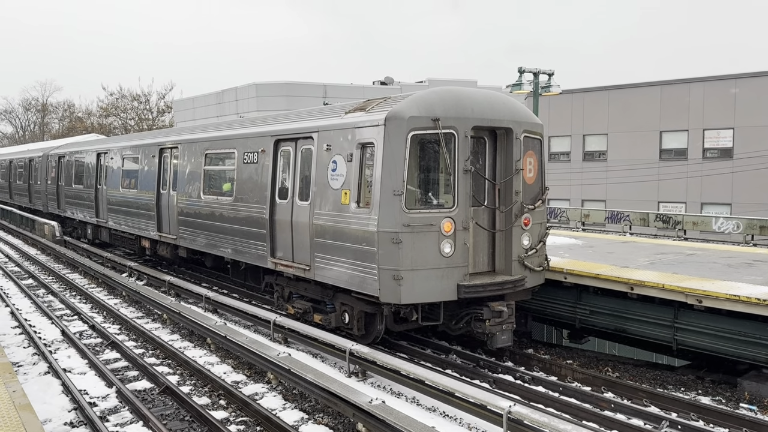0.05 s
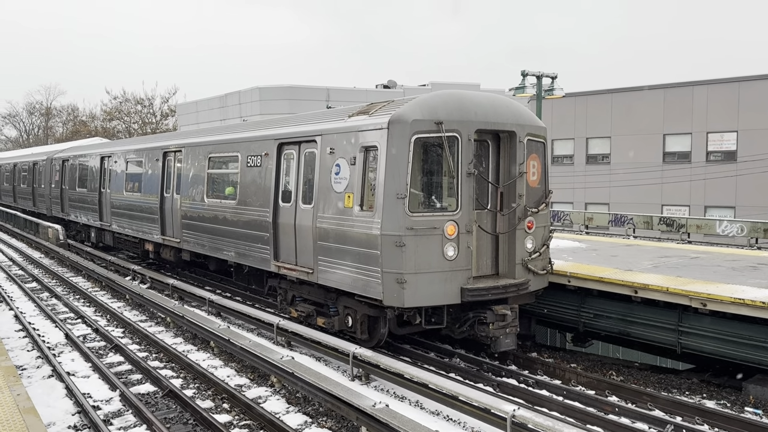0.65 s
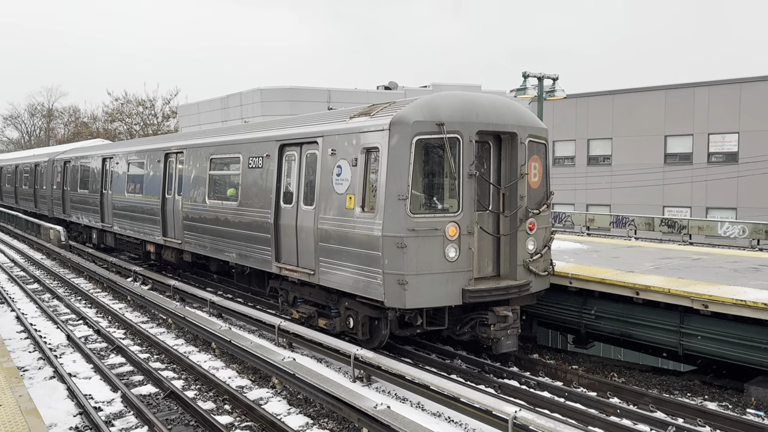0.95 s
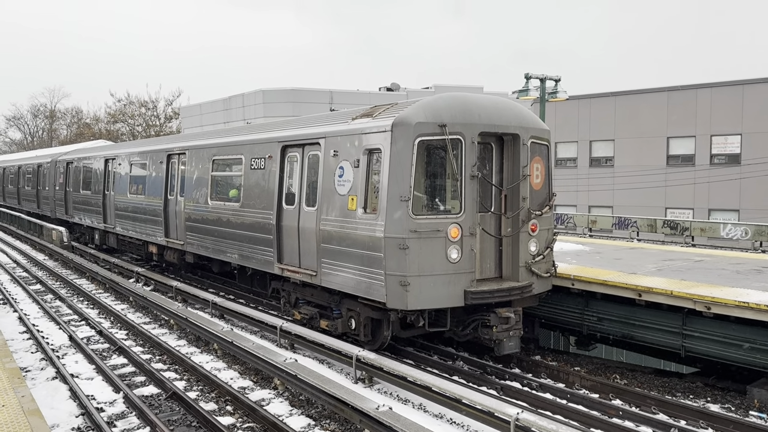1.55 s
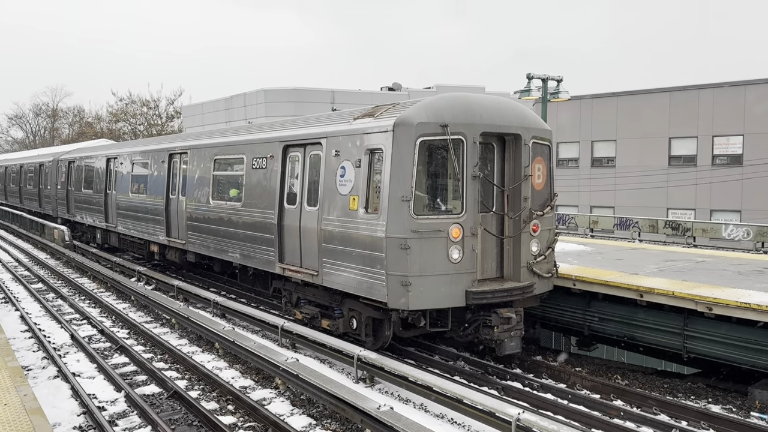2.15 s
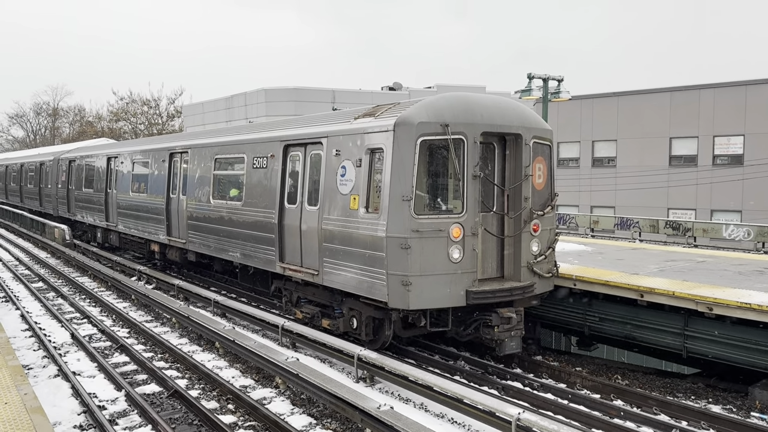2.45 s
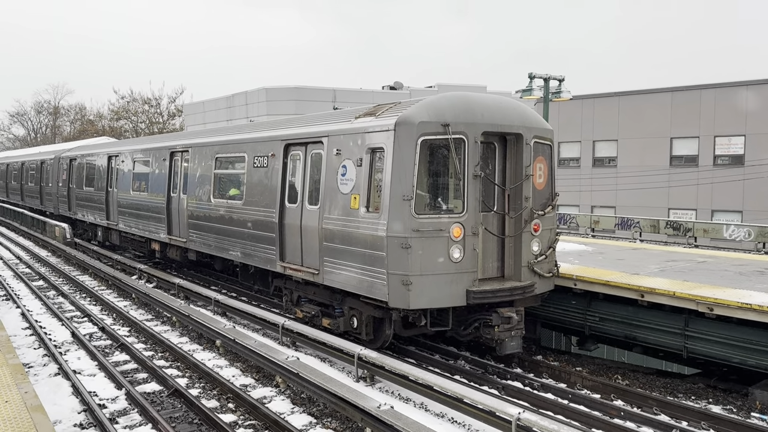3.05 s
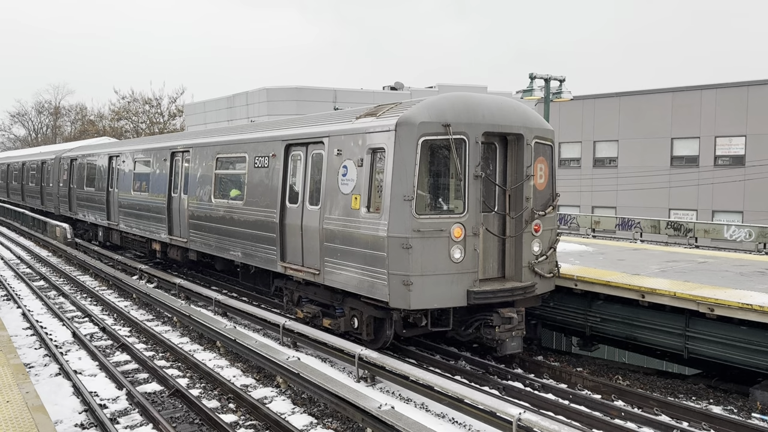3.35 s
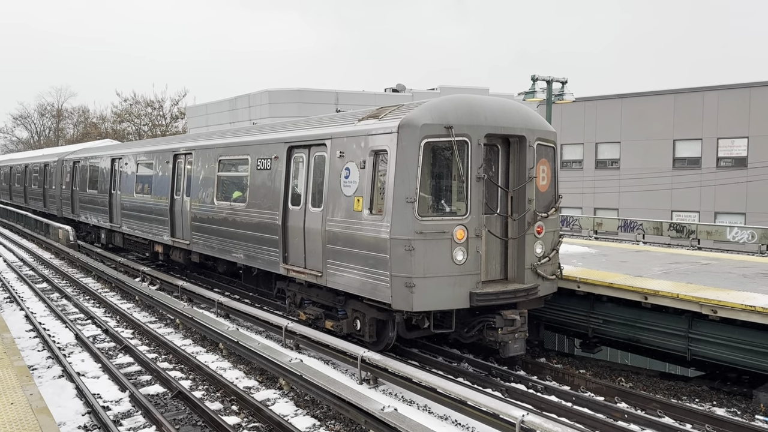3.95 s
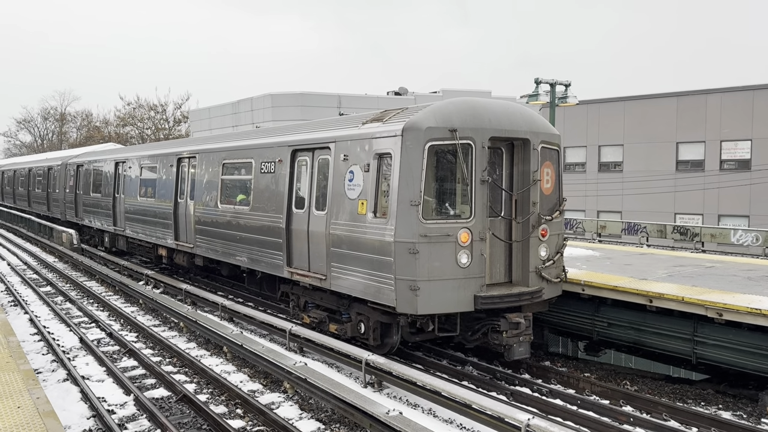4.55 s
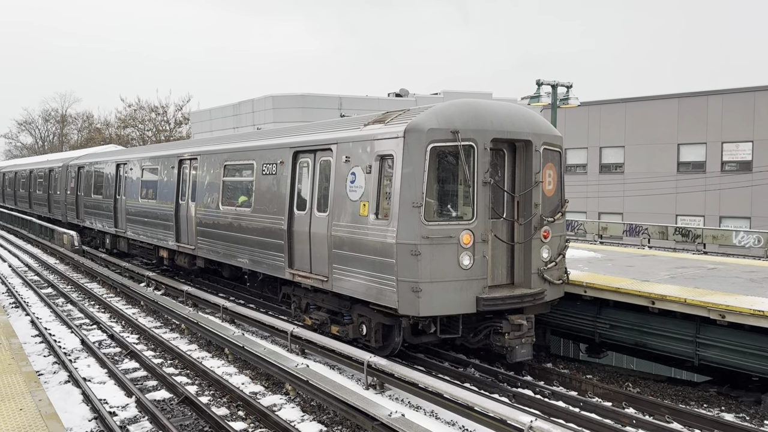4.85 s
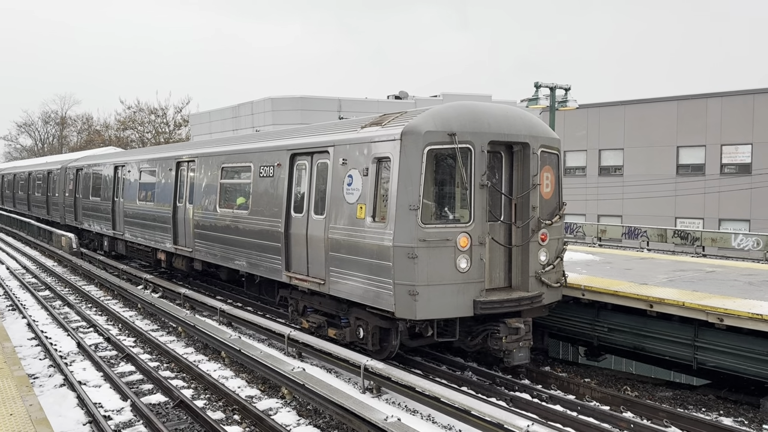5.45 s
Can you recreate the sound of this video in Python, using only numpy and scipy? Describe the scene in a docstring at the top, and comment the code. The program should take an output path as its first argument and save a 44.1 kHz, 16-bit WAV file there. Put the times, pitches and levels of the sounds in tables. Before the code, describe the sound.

A subway train stands at an open elevated platform, its machinery humming steadily with a throbbing high whine, a dry chirr and hissing fans. About a second in, a valve gives a few short spits of air. Wind rumbles lightly on the close stereo microphone, thumps once around two seconds, then builds through the second half into a strong gust of sharp buffets over the hum.

```python
"""An open, elevated subway platform, with a stereo microphone beside a standing train.
The train's auxiliary machines are running: one shaft hums in many overtones under a throbbing whine
and a dry chirr, an inverter sings, fans hiss and a valve spits air.
Right at the microphone, wind rumbles on the two ports and grows into a gust of sharp buffets."""
import sys
import numpy as np
from scipy import signal
from scipy.fft import rfft, irfft
from scipy.io import wavfile
from scipy.ndimage import uniform_filter1d

SR = 44100
rng = np.random.default_rng(int(sys.argv[2]) if len(sys.argv) > 2 else 0)


def pcm_store(signal):
    """Save signal as 16-bit PCM."""
    levels = np.round(np.clip(np.atleast_2d(signal), -1, 1) * 32767)
    wavfile.write(sys.argv[1], SR, levels.astype(np.int16).T)


N = 246827
TIME, BINS = np.arange(N) / SR, np.fft.rfftfreq(N, 1 / SR)
SHAFT_HZ = 27.003


def amp(db):
    """Decibels to gain."""
    return 10 ** (np.asarray(db) / 20)


def unit_rms(x):
    """Scales to an rms of 1."""
    return x / np.sqrt(np.mean(x ** 2) + 1e-20)


def spectrum_at(points, hz):
    """Joins a spectrum's points on a log-frequency axis."""
    f, value = np.transpose(points)
    return np.interp(np.log(hz + 1), np.log(f + 1), value)


def follow(rows, t=TIME):
    """Each column of a curve at the times t."""
    s, *columns = np.transpose(rows)
    return [np.interp(t, s, c) for c in columns]


def add(mix, s, sound):
    """Mixes a stereo sound in at s seconds."""
    part = mix[:, max(round(s * SR), 0):][:, :sound.shape[1]]
    part += sound[:, :part.shape[1]]


def swell(peak_s, width_s, db):
    """A bell-shaped rise or dip in dB."""
    return db * np.exp(-((TIME - peak_s) / width_s) ** 2)


def drift(rate_hz):
    """A slow random wander of rms 1."""
    return unit_rms(irfft(rfft(rng.standard_normal(N)) / (1 + (BINS / rate_hz) ** 4), N))


def noise(shape, shared, size=N):
    """Noise of a given spectrum at two ports that share a part of it."""
    left, other = rfft(rng.standard_normal((2, size)))
    right = shared * left + np.sqrt(1 - shared ** 2) * other
    return unit_rms(irfft(np.array([left, right]) * shape, size))


def band(hz, centre_hz, width_hz):
    """Gain of one resonance."""
    return 1 / (1 + ((hz - centre_hz) / width_hz) ** 2 * 2)


def delay_right(x, ms=0.15):
    """Sound reaches the right port later, or earlier if ms is negative."""
    return np.array([x[0], irfft(rfft(x[1]) * np.exp(-2j * np.pi * BINS * ms / 1000), N)])


# Overtones the casing favours, heard from the platform. Each row: multiple of the shaft rate, level in dB.
STRONG_OVERTONES = [(2, -54.5), (3, -53.5), (7, -60.5), (25, -60.5), (26, -60.5), (27, -58), (30, -51),
                    (35, -60.5), (36, -57.5), (37, -63.5), (42, -60), (44, -64), (47, -53.5), (49, -63),
                    (53, -60.5), (56, -61.5), (57, -63), (67, -64.5), (80, -61), (86, -63.5), (92, -67),
                    (142, -65)]
# The weaker ones between them. Each row: frequency in Hz, typical level of one overtone in dB.
WEAK_OVERTONES = [(30, -74), (500, -75), (700, -67), (1400, -65), (1700, -92), (2400, -84), (3000, -83.5),
                  (4000, -78), (5200, -102)]
def shaft_hum(turns, sway_db=1.12, spread_rad=0.95, count=260, groups=7, size=4096):
    """Reflections give each overtone its own phase at each port, and moving air sways them."""
    multiples = np.arange(1, count + 1)
    hz = multiples * SHAFT_HZ
    levels = spectrum_at(WEAK_OVERTONES, hz) + rng.uniform(-4, 4, count)
    for multiple, db in STRONG_OVERTONES:
        levels[multiple - 1] = db
    phase, side = rng.uniform(0, 2 * np.pi, count), rng.choice([-1, 1], count)
    apart = side * spread_rad * np.minimum(hz / 1300, 2)  # long waves reach both ports alike
    overtones = np.sqrt(2) * amp(levels) * np.exp(1j * np.array([phase + apart / 2, phase - apart / 2]))
    out = np.zeros((2, N))
    for group in range(groups):
        members = np.pad(overtones * (multiples % groups == group), ((0, 0), (1, 0)))
        one_turn = irfft(members, size) * size / 2
        sway = amp(sway_db * drift(rate_hz=2.8))
        out += sway * np.array([np.interp(turns % 1 * size, np.arange(size), port) for port in one_turn])
    return out


# The deep note of the standing train. Each row: time in seconds, level in dB.
DRONE_LEVELS = [(0, -48), (2.3, -60.5), (2.9, -44.5), (3.5, -43), (3.9, -54)]
def shaft_drone(turns):
    """A tone at five times the shaft rate swells and sinks, alike at both ports."""
    return np.sqrt(2) * amp(follow(DRONE_LEVELS)[0]) * np.sin(2 * np.pi * 5 * turns)


# The whine at the microphone, as its reflections add and cancel.
# Each row: time in seconds, left level in dB, right level in dB.
WHINE_LEVELS = [(0, -55, -52), (.45, -48.5, -50), (.85, -65, -55.5), (1.21, -61, -54), (1.27, -50, -49.5),
                (1.68, -48.5, -49.5), (2.25, -49.5, -68), (2.65, -49.5, -48), (2.87, -51, -55),
                (3.2, -48.5, -47.5), (3.6, -51, -59), (3.85, -48.5, -53), (4.1, -54, -51),
                (4.4, -53.5, -46), (4.75, -50, -43), (5.1, -57, -47.5), (5.6, -53, -48)]
# The whine at the right port. Each row: time in seconds, lag behind the left in radians.
WHINE_RIGHT_LAG = [(0, 1), (1.6, 0.33), (2.2, 2.9), (3, 0.27), (5.6, 1.26)]
def whine(turns, multiple=78, neighbours_db=-69.5, skew_rad=0.85, lag_share=0.45):
    """One strong overtone beats with its two neighbours: a clean throb, once a turn."""
    angle = 2 * np.pi * turns
    lag = np.array([np.zeros(N), follow(WHINE_RIGHT_LAG)[0]])
    tone = amp(follow(WHINE_LEVELS)) * np.sin(multiple * angle - lag)
    throb = amp(neighbours_db + swell(peak_s=3.1, width_s=1.74, db=12))
    below = np.sin((multiple - 1) * angle - lag_share * lag)
    above = np.sin((multiple + 1) * angle - lag_share * lag + skew_rad)
    return np.sqrt(2) * (tone + throb * (below + above))


# How hard the shaft rubs. Each row: time in seconds, gain in dB.
RUB_PRESSURE = [(0, 5.5), (1.3, 5), (1.53, 13), (1.9, 2), (3.1, 6.5), (4.65, 2), (4.98, 9.5), (5.6, 2.5)]
# What the rub sets ringing, off to the right. Each row: centre in Hz, width in Hz, relative level in dB.
RUB_RESONANCES = [(7880, 77, -73), (9035, 136, -74), (9770, 110, -64)]
def chirr(turns, decay_turns=0.37, steady=0.17, flicker_db=1.8, sizzle_db=-58.5):
    """The same rough patch rubs on each turn, exciting high resonances under a broad sizzle."""
    stroke = unit_rms(steady + np.exp(-(turns % 1) / decay_turns))
    rub = stroke * amp(follow(RUB_PRESSURE)[0] + flicker_db * drift(rate_hz=9.1))
    patch = rng.standard_normal(int(SR / SHAFT_HZ))
    grit = rfft(rub * patch[(turns % 1 * len(patch)).astype(int)])
    rings = sum(amp(db) * unit_rms(irfft(grit * band(BINS, hz, width), N))
                for hz, width, db in RUB_RESONANCES)
    rings *= np.sqrt(np.mean(rub ** 2))
    sizzle = amp(sizzle_db) * unit_rms(rub ** 0.3) * noise(band(BINS, 13900, 2900), shared=0.83)
    return delay_right(rings + sizzle, ms=-0.355)


def inverter(hz=1320.9, level_db=-54):
    """A steady electrical tone, swayed a little by the moving air."""
    return np.sqrt(2) * amp(level_db + drift(rate_hz=6)) * np.sin(2 * np.pi * hz * TIME)


# The fans, a little left of the microphone. Each row: frequency in Hz, relative density in dB.
FAN_SPECTRUM = [(25, -50), (50, -34), (120, -15), (200, -18), (290, -11), (520, -9.5), (800, -9),
                (1300, -13), (1700, -15), (2150, -9), (2900, -20), (6300, -28.5), (10000, -26),
                (15500, -44.5)]
# The train's vents, facing the platform. Each row: centre in Hz, width in Hz, relative level in dB.
VENT_BANDS = [(4380, 1700, -58.5), (5424, 72, -68), (7860, 1800, -63.5)]
def fans(rush_db=-46.5):
    """Cooling air rumbles and hisses; the vents add two broad bands of hiss and one thin whistle."""
    shared = spectrum_at([(100, 1.0), (600, 0.057), (3000, 0.59), (12000, 0.17)], BINS)
    rush = amp(rush_db) * noise(amp(spectrum_at(FAN_SPECTRUM, BINS)), shared)
    vents = sum(amp(db) * noise(band(BINS, hz, width), shared=0.51) for hz, width, db in VENT_BANDS)
    return delay_right(rush) + vents * amp([[.8], [-.8]])  # slightly louder on the left


# Escaping air, heard from the platform. Each row: frequency in Hz, relative density in dB.
PUFF_SPECTRUM = [(500, -20), (950, 0.5), (3000, -0.5), (4500, 2.5), (6000, -8.5), (9000, -10.5),
                 (13000, -40)]
# The valve, a little to the left. Each row: start in seconds, level in dB, decay in seconds,
# whistle's share of the power, upper edge in Hz, hollow resonance in Hz.
VALVE_SPITS = [(.84, -42, 0.03, 0.3, 9000, 1330), (1.107, -32, 0.047, 0.06, 11000, 1330),
               (1.142, -35, 0.034, 0, 6000, 1140), (5.078, -37, 0.034, 0, 3500, 1510)]
def valve(whistle_hz=4340, hollow_db=14, rise_s=.0012, echo_db=-11, echo_s=0.11):
    """Short puffs of air ring in the valve's outlet, whistle at its lip and linger under the cars."""
    out, t = np.zeros((2, N)), TIME[:SR // 2]
    hz = np.fft.rfftfreq(len(t), 1 / SR)
    for s, db, decay, share, top_hz, hollow_hz in VALVE_SPITS:
        hollow = 1 + amp(hollow_db) * band(hz, hollow_hz, width_hz=190)
        outlet = hollow / np.sqrt(1 + (hz / top_hz) ** 4)
        puff = noise(amp(spectrum_at(PUFF_SPECTRUM, hz)) * outlet, shared=0.2, size=len(t))
        whistle = noise(band(hz, whistle_hz, width_hz=150), shared=0.24, size=len(t))
        air = np.sqrt(1 - share) * puff + np.sqrt(share) * whistle
        fall = np.exp(-(t / decay) ** 2) + amp(echo_db) * np.exp(-t / echo_s)
        envelope = (1 - np.exp(-t / rise_s)) * fall
        add(out, s, amp(db) * envelope / envelope.max() * air)
    return delay_right(out)


# The largest eddies, striking the microphone itself.
# Each row: start in seconds, length in seconds, level in dB, centre in Hz.
WIND_BUFFETS = [(0.179, 0.021, -30, 158), (0.399, 0.0098, -25.5, 127), (0.446, 0.014, -27.5, 235),
                (0.459, 0.019, -26, 109), (.946, 0.0065, -36, 274), (1.325, 0.0052, -30, 340),
                (1.449, 0.016, -32.5, 236), (1.613, 0.0069, -35, 227), (2.033, 0.012, -30, 130),
                (2.058, 0.016, -20.5, 271), (2.075, .02, -25.5, 75), (2.295, 0.01, -37, 274),
                (3.652, 0.05, -28.5, 188), (3.715, 0.004, -24, 380), (3.737, 0.032, -28.5, 392),
                (3.769, 0.0086, -21, 347), (3.777, 0.0078, -19, 413), (3.798, 0.016, -27.5, 388),
                (3.825, 0.011, -21, 358), (3.858, 0.0065, -20.5, 470), (3.888, 0.0073, -28, 554),
                (3.947, 0.015, -25.5, 380), (3.987, 0.0065, -25, 356), (4.024, 0.0082, -29.5, 565),
                (4.038, 0.025, -29.5, 266), (4.073, 0.012, -23.5, 360), (4.132, 0.0079, -24.5, 146),
                (4.154, 0.017, -27.5, 278), (4.197, 0.0046, -24, 340), (4.246, 0.027, -25, 335),
                (4.282, 0.0083, -17, 455), (4.304, 0.0082, -25, 454), (4.329, 0.016, -22.5, 552),
                (4.413, 0.007, -33, 760), (4.452, 0.013, -28, 432), (4.491, 0.011, -21, 253),
                (4.555, 0.011, -26, 74.5), (4.613, 0.05, -34, 756), (4.65, 0.0062, -23.5, 200),
                (4.721, 0.022, -28.5, 414), (4.785, 0.0072, -22.5, 402), (4.811, 0.0098, -25, 484),
                (4.821, 0.013, -25, 142), (4.863, 0.0096, -32.5, 513), (4.981, 0.017, -30.5, 433),
                (5.017, 0.0094, -22.5, 566), (5.03, 0.014, -27, 335), (5.048, 0.006, -19, 159),
                (5.163, 0.013, -28, 414), (5.214, 0.011, -25, 710), (5.228, 0.0071, -23, 590),
                (5.291, 0.0065, -26, 440), (5.3, 0.028, -25, 212), (5.335, .01, -25, 710),
                (5.348, 0.0067, -19.5, 585), (5.375, 0.0059, -26.5, 410), (5.396, 0.012, -24, 539),
                (5.457, 0.025, -29, 384), (5.531, 0.0048, -29, 634), (5.586, .014, -32.5, 172)]
def buffets(lowest_hz=58, swerve=0.29, apart_rad=.2, roughness=.5):
    """Each buffet is a few uneven swings of pressure that start abruptly and slow down."""
    out, t = np.zeros((2, N)), TIME[:4096]
    hz = np.fft.rfftfreq(len(t), 1 / SR)
    for s, length, db, centre_hz in WIND_BUFFETS:
        churn = noise(1 / (1 + (hz / centre_hz / 2) ** 2), shared=.85, size=len(t))
        slowing = .5 + .9 * np.exp(-t / length * 1.4)
        cycles = np.cumsum(centre_hz * slowing * (1 + swerve * churn[0, ::-1])) / SR + rng.random()
        swing = np.sqrt(2) * np.cos(2 * np.pi * cycles + apart_rad * rng.standard_normal((2, 1)))
        envelope = np.clip(t / length * 8, 0, 1) / (1 + (t / length) ** 6)
        top_hz = np.clip(1.99 * centre_hz, 150, 4000)
        passband = signal.butter(3, [lowest_hz, top_hz], "bandpass", fs=SR, output="sos")
        eddy = unit_rms(signal.sosfilt(passband, envelope * (swing + roughness * churn)))
        add(out, s - 1 / centre_hz / 4, amp(db) * eddy * np.sqrt(length / t[-1]))
    return out


# The breeze over the platform drops, then builds to a strong wind.
# Each row: time in seconds, base level of the rumble in dB, base level of the flutter in dB.
BREEZE = [(0, -45.5, -44), (1.55, -47, -48.5), (1.8, -48, -63), (2.4, -45.5, -50.5), (2.7, -50.5, -54),
          (3.5, -35.5, -46.5), (3.7, -36, -36.5), (4.05, -32, -33.5), (4.45, -30.5, -33), (4.6, -36, -43),
          (5.2, -34.5, -37.5), (5.35, -32, -37.5), (5.6, -30, -34.5)]
# Short gusts and lulls at the microphone. Each row: peak in seconds, half length in seconds, rise in dB.
GUSTS_AND_LULLS = [(.19, 0.1, 6), (0.936, 0.087, 5.5), (1.398, 0.19, 7.5), (2.085, 0.065, 18.5),
                   (4.94, 0.018, -9), (5.272, 0.012, -8)]
def wind_db(flutter_share=0.68):
    """Levels of rumble and flutter: the slow wind with its short gusts on top."""
    rumble_db, flutter_db = follow(BREEZE)
    gusts = sum(swell(*gust) for gust in GUSTS_AND_LULLS)
    return rumble_db + gusts, flutter_db + flutter_share * gusts


def rumble(low_cut_hz=48, upper_hz=150):
    """Large eddies press slowly on the ports; the microphone passes little deep bass."""
    low_cut = (BINS / low_cut_hz) ** 4 / np.sqrt(1 + (BINS / low_cut_hz) ** 8)
    return amp(wind_db()[0]) * noise(low_cut / (1 + (BINS / upper_hz) ** 4), shared=0.68)


# Faster air sheds smaller eddies at the ports. Each row: time in seconds, typical centre in Hz.
EDDY_PITCH = [(0, 200), (1.4, 275), (3.55, 162), (3.8, 337), (4.5, 334), (5.6, 460)]
def flutter(boost_db=2.0, scatter=0.4, cycles=0.75, apart_rad=.45, count=1250):
    """A stream of small eddies, each about one swing of pressure, with lulls between them."""
    out, t = np.zeros((2, N)), TIME[:2048] - TIME[1024]
    times = (np.arange(count) + rng.uniform(-1.025, 1, count)) / count * N / SR
    for s, detune, phase, offset in zip(times, *rng.standard_normal((3, count))):
        typical_hz = follow(EDDY_PITCH, s)[0]
        hz = typical_hz * np.exp(scatter * np.clip(detune, -2, 1.5))
        swing = np.cos(2 * np.pi * (hz * t + phase) + np.array([[0], [apart_rad * offset]]))
        envelope = np.exp(-(hz * t / cycles) ** 2)
        add(out, s + t[0], rng.random() * np.sqrt(typical_hz) * swing * envelope)
    return amp(wind_db()[1] + boost_db) * unit_rms(out)


# Stronger wind tears at the port edges. Each row: time in seconds, gain against the eddies in dB.
CRACKLE_GAIN = [(3.8, -42), (4.3, -18.5), (5.6, -13.5)]
def crackle(eddies, centre_hz=850, width_hz=750, top_hz=2500):
    """Each swing of pressure tears off a burst of fine turbulence, the hardest ones far more."""
    push = np.sqrt(abs(uniform_filter1d(eddies[0] ** 2, size=64)))
    tear = amp(follow(CRACKLE_GAIN)[0]) * push * np.sqrt(unit_rms(push))
    return tear * noise(band(BINS, centre_hz, width_hz) / (1 + (BINS / top_hz) ** 4), shared=0.35)


def across_ports(x, lead_rad=1.11, corner_hz=250):
    """Eddies pass the right port first; all but the largest lead there by the same angle."""
    angle = lead_rad * np.tanh(BINS / corner_hz) / 2
    return irfft(rfft(x) * np.exp(1j * np.array([-angle, angle])), N)


def scene(speed_wander=0.00012):
    """The idling train, heard through the wind on the microphone."""
    turns = np.cumsum(SHAFT_HZ * (1 + speed_wander * drift(rate_hz=1.72))) / SR
    shaft = shaft_hum(turns) + shaft_drone(turns) + whine(turns) + chirr(turns)
    train = shaft + inverter() + fans() + valve()
    eddies = flutter() + buffets()
    wind = across_ports(rumble() + eddies + crackle(eddies))
    return train + wind * amp([[.5], [-.5]])  # wind slightly louder on the left


def record(dry):
    """The recorder passes sound up to 15750 Hz."""
    lowpass = signal.firwin(511, 15750, window=("kaiser", 9), fs=SR)
    return signal.oaconvolve(dry, lowpass[None], "same")


dry = scene()
out = record(dry)
pcm_store(out)
```